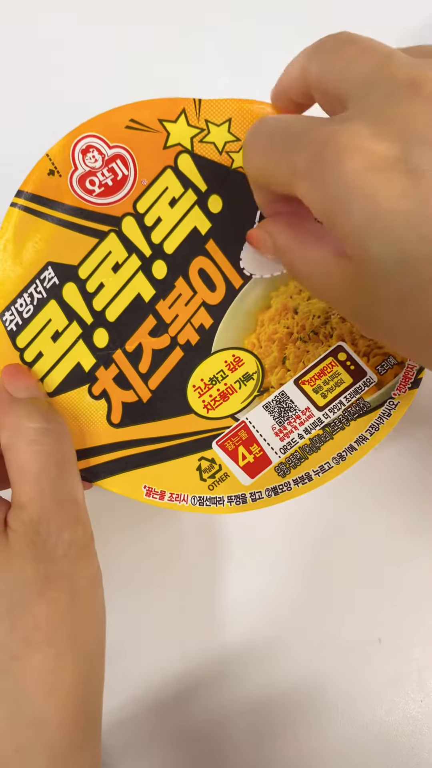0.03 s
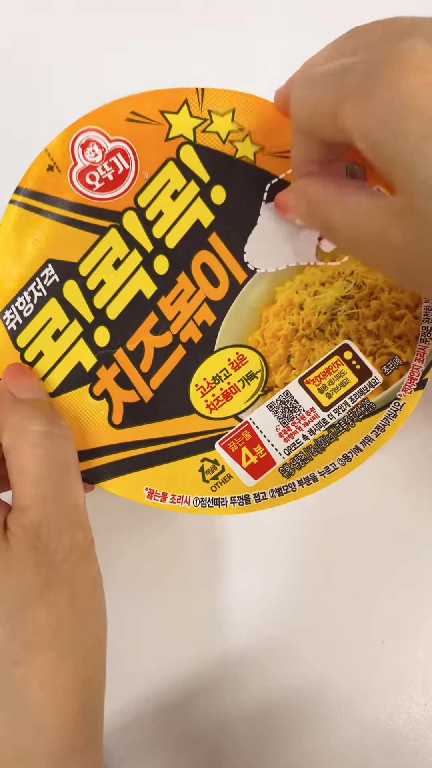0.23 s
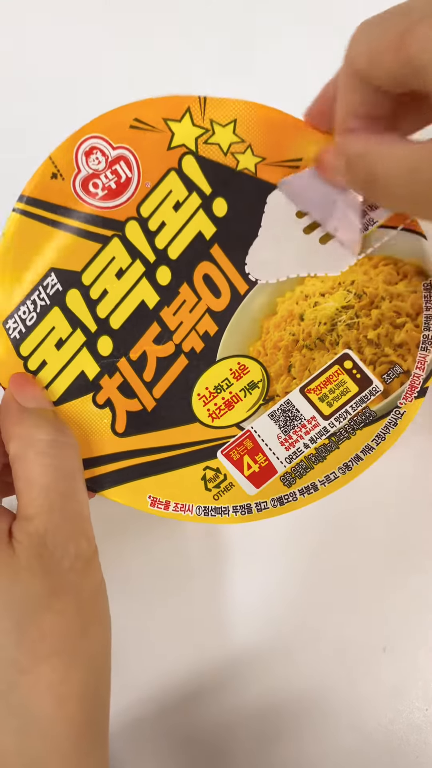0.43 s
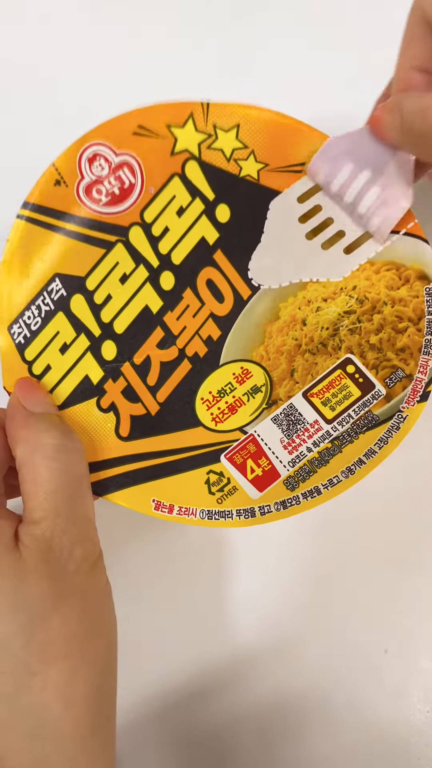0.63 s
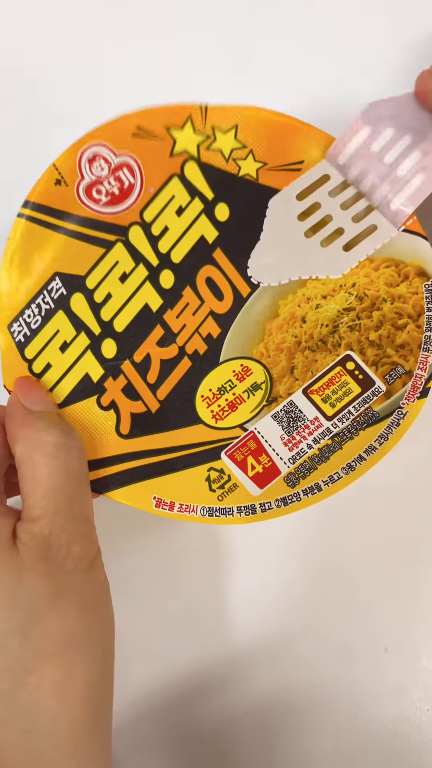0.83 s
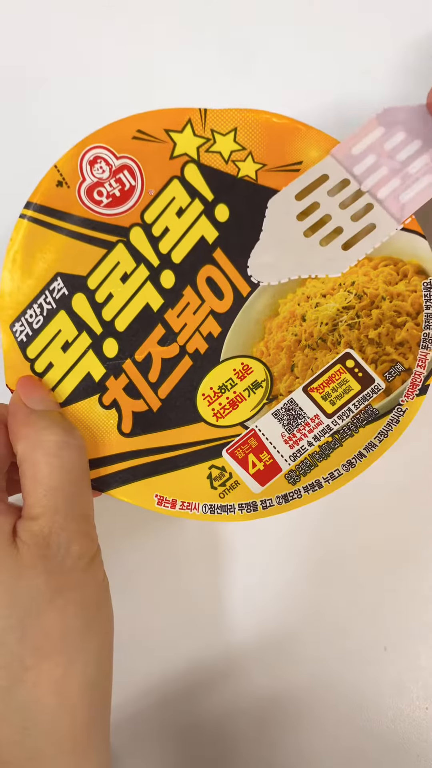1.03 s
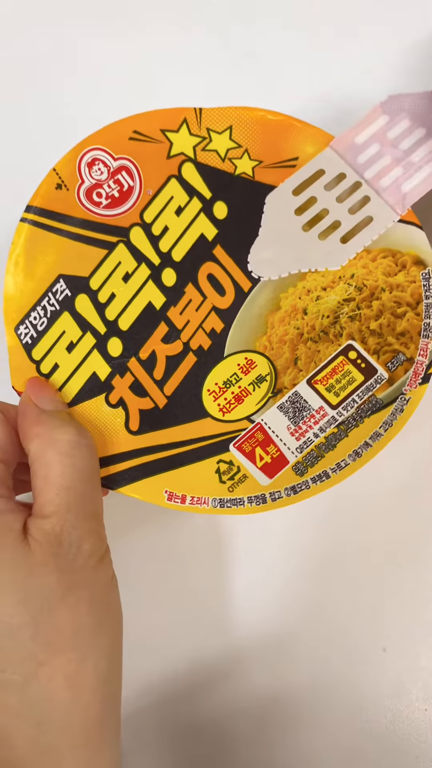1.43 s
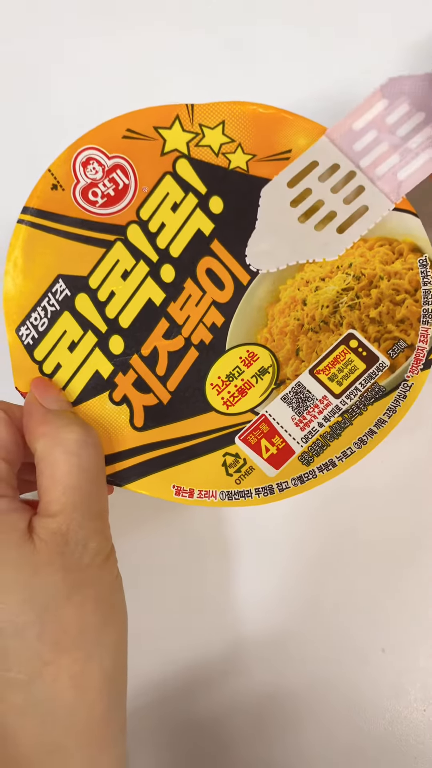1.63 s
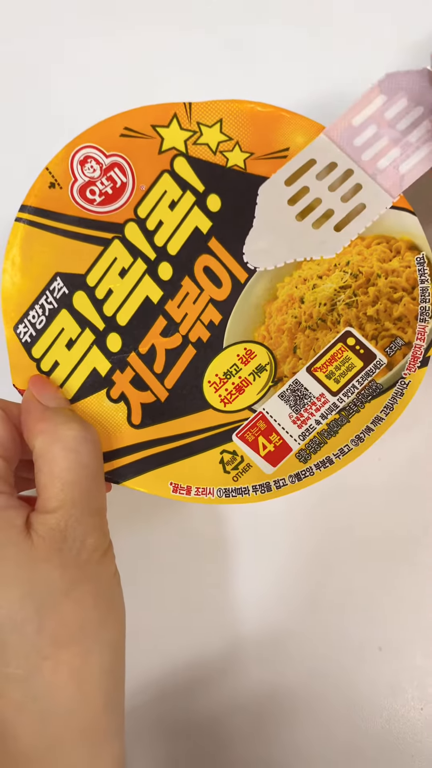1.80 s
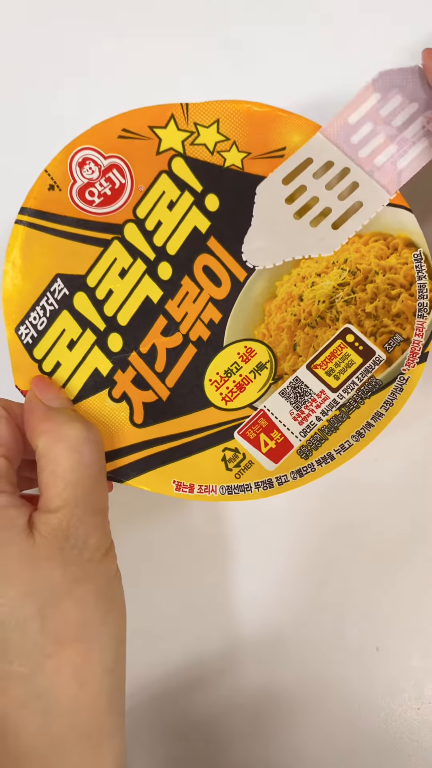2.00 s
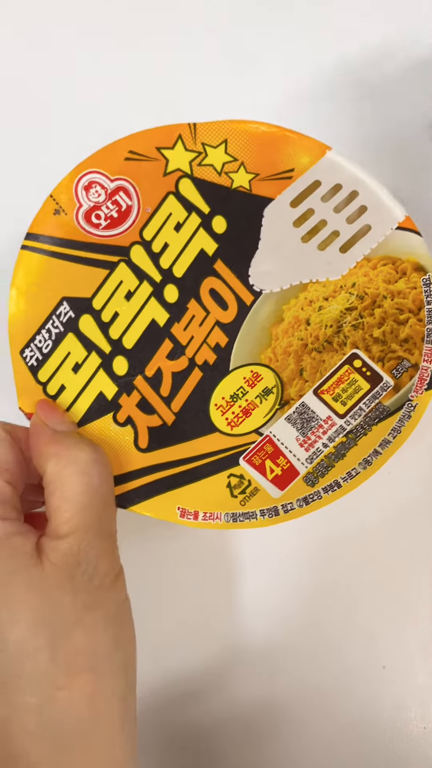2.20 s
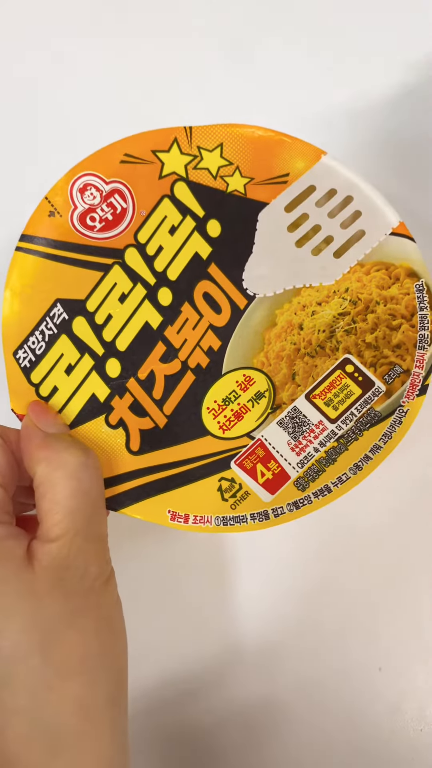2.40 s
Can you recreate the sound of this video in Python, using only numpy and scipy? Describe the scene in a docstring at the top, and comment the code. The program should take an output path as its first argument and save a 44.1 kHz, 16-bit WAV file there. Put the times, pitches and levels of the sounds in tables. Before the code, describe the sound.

A perforated paper tab tearing off a noodle cup lid with crisp little snaps.

```python
"""Peeling the tab off a noodle cup

A quiet room, a stereo pair of microphones close to the cup. A fingernail picks a perforated paper tab
loose and it is peeled off the lid. Each paper bridge that tears gives a burst of fibre snaps and rings
the taut lid and the cup under it. Then the loose tab ticks as it bends, comes away with a short rasp,
and the hand nudges the cup on the table."""
import sys
import numpy as np
from scipy import signal
from scipy.fft import rfft, irfft
from scipy.io import wavfile
from scipy.ndimage import uniform_filter1d

SR = 44100
rng = np.random.default_rng(int(sys.argv[2]) if len(sys.argv) > 2 else 0)


def wrap_up_sound(samples):
    """Save the sound to the file named by the first command line argument, as 16-bit audio."""
    columns = np.atleast_2d(samples).T
    # keep every value between -1 and 1, then stretch to whole-number steps
    tamed = np.clip(columns, -1, 1)
    steps = np.round(tamed * 32767).astype(np.int16)
    wavfile.write(sys.argv[1], SR, steps)


N = 112454
T = np.arange(N) / SR
HIT_T = np.arange(4096) / SR


def amp(db):
    """Decibels to gain."""
    return 10 ** (np.asarray(db) / 20)


def unit(x):
    """Scales to rms 1."""
    return x / np.sqrt(np.mean(x ** 2) + 1e-20)


def unit_hit(x, samples=180):
    """Scales a hit to the energy of four milliseconds at rms 1."""
    return unit(x) * np.sqrt(samples / x.shape[-1])


def read(points, hz):
    """Reads a spectrum table on a log-frequency axis."""
    f, value = np.transpose(points)
    return np.interp(np.log(hz + 1), np.log(f + 1), value)


def level(points):
    """Gain over time from a table of (t/s, level/dB)."""
    return amp(np.interp(T, *np.transpose(points)))


def add(mix, s, sound):
    """Adds a stereo sound at a time."""
    part = mix[:, max(round(s * SR), 0):][:, :sound.shape[1]]
    part += sound[:, :part.shape[1]]


def convolve(x, response):
    """Filters each channel, keeping the length."""
    return signal.fftconvolve(np.atleast_2d(x), np.atleast_2d(response), axes=1)[:, :x.shape[-1]]


# Likeness of the noise at the two microphones (f/Hz, correlation)
MIC_LIKENESS = [(40, 0.89), (150, 0.87), (300, 0.1), (2000, 0.035)]
def noise(colour):
    """Stereo noise of a given spectrum, nearly mono in the bass."""
    hz = np.fft.rfftfreq(N, 1 / SR)
    left, apart = rfft(rng.standard_normal((2, N)))
    same = read(MIC_LIKENESS, hz)
    right = same * left + np.sqrt(1 - same ** 2) * apart
    return unit(irfft(np.array([left, right]) * amp(read(colour, hz)), N))


# Spectrum of the room air (f/Hz, relative level/dB)
AIR_COLOUR = [(20, -16), (82, -8), (256, -4), (545, -15.5), (734, -8), (1370, -15), (1890, -21.5),
              (3820, -32), (16000, -58)]
# Tones of the hum (f/Hz, level/dB)
HUM_TONES = [(80.7, -61.5), (177.6, -67), (242.2, -62.5)]
def ventilation(air_db=-55.5):
    """Quiet ventilation noise all round the microphones, with a faint hum in the centre."""
    hum = sum(amp(db) * np.sqrt(2) * np.sin(2 * np.pi * (hz * T + rng.random())) for hz, db in HUM_TONES)
    return amp(air_db) * noise(AIR_COLOUR) + hum


# Decay of the room (f/Hz, t60/s)
ROOM_DECAY = [(150, 0.37), (3000, 0.15), (7000, 0.17), (15000, 0.36)]
# Spectrum of its tail (f/Hz, relative level/dB)
TAIL_COLOUR = [(100, -13), (300, 5), (1000, 2.5), (2500, 3), (7000, -4.5), (15000, -11.5)]
# Reflection from near the cup (t/s, left level/dB, right level/dB)
REFLECTIONS = [(.0084, -12.5, -25)]
def room(x, tail_db=-12, early_db=3.5, early_s=.026):
    """The room answers with a dull near reflection and a short diffuse tail."""
    hz, t, spectra = signal.stft(rng.standard_normal((2, SR // 2)), SR, nperseg=256)
    decay_db = early_db * np.exp(-t / early_s) - 60 * t / read(ROOM_DECAY, hz)[:, None]
    tail = signal.istft(spectra * amp(read(TAIL_COLOUR, hz)[:, None] + decay_db), SR, nperseg=256)[1]
    tail *= np.clip(np.arange(tail.shape[1]) / SR / .0015 - 1, 0, 1)  # fades in from 1.5 to 3 ms
    tail *= amp(tail_db) / np.linalg.norm(tail[0])
    dull = np.hanning(11)
    for s, left_db, right_db in REFLECTIONS:
        add(tail, s, amp([[left_db], [right_db]]) * dull / dull.sum())
    return convolve(x, tail)


# Modes of the air inside the cup (f/Hz, relative level/dB)
CAVITY_MODES = [(857, -2), (1121, -4), (1238, 1), (1344, 1), (2090, -3)]
def cavity(x, t60=.42):
    """The air in the cup rings on in narrow resonances after every snap."""
    fade = amp(-60 * T / t60)
    phases = 2 * np.pi * rng.random((len(CAVITY_MODES), 2, 1))
    ring = sum(amp(db) * np.sin(2 * np.pi * hz * T + phase)
               for (hz, db), phase in zip(CAVITY_MODES, phases))
    return convolve(x, 2 * ring * fade / fade.sum())


# Rumble of the handled cup (t/s, level/dB)
RUMBLE_LEVEL = [(0, -63), (.3, -52), (.39, -43), (.48, -56), (.58, -44), (.68, -49), (1.0, -62),
                (1.62, -61.5), (1.69, -51.5), (1.76, -57.5), (2.55, -60.5)]
# Its spectrum (f/Hz, relative level/dB)
RUMBLE_COLOUR = [(20, -22), (60, 7.5), (120, 0), (250, -7), (500, -30), (1500, -60)]
def handling():
    """Low rumble of the hand on the cup."""
    return noise(RUMBLE_COLOUR) * level(RUMBLE_LEVEL)


# Modes of the cup's base (f/Hz, relative level/dB)
BASE_MODES = [(255, 0.5), (620, -2), (705, 4.5), (830, -3)]
# The cup rubs on the table (t/s, level/dB before panning)
SLIDE_LEVEL = [(2.3, -89), (2.42, -56.5), (2.55, -55)]
# The hand nudges the cup (t/s, level/dB before panning)
HAND_NUDGES = [(2.463, -41), (2.531, -39.5), (2.545, -43)]
CUP_RISE_S, CUP_T60_S = .0015, .026
def slide(pan_db=3):
    """The cup shifts on the table, left of centre: friction and a few soft nudges ring its base."""
    ring = sum(amp(db - 60 * HIT_T / CUP_T60_S) * np.sin(2 * np.pi * hz * HIT_T) for hz, db in BASE_MODES)
    ring = unit_hit(ring * (1 - np.exp(-HIT_T / CUP_RISE_S)))[None]
    out = level(SLIDE_LEVEL) * unit(convolve(rng.standard_normal(N), ring))
    for s, db in HAND_NUDGES:
        add(out, s, amp(db) * ring)
    return out * amp([[pan_db], [-pan_db]])


def cup_thump(hz, pan_db=1.5):
    """The cup under the lid gives one damped low note near hz, a little right of centre."""
    ring = np.sin(2 * np.pi * hz * rng.uniform(.88, 1.12) * HIT_T) * amp(-60 * HIT_T / CUP_T60_S)
    return amp([[-pan_db], [pan_db]]) * unit_hit(ring * (1 - np.exp(-HIT_T / CUP_RISE_S)))


# Modes of the lid (multiple of its pitch, relative left level/dB, relative right level/dB, t60/s)
LID_MODES = [(1, 2.5, -3, 0.014), (.72, -21, -26, 0.013), (.87, -24, -28, 0.035), (1.22, -3.5, -8, 0.016),
             (2.05, -16, -24, .025)]
def lid(hz, rise_s=.0009, left_lead_s=.00013):
    """The taut lid rings, earlier and louder at the left microphone."""
    t = np.maximum(HIT_T - np.array([[0], [left_lead_s]]), 0)
    ring = sum(amp(np.array([[left], [right]]) - 60 * t / t60) * np.sin(2 * np.pi * hz * ratio * t)
               for ratio, left, right, t60 in LID_MODES)
    return unit_hit(ring * (1 - np.exp(-(t / rise_s) ** 2)))


# Spectrum of tearing paper (f/Hz, relative level/dB)
PAPER_COLOUR = [(400, -25.5), (650, -10), (1200, 1), (1700, -7.5), (2100, 1), (2800, -7), (3500, -2.5),
                (6000, -6), (7500, -8), (10200, -10), (13000, -19), (15000, -13.5)]
def paper(tilt_db, peak_hz, peak_db=3.5, peak_octaves=.24, ripple_db=2):
    """Response of the paper to one snapping fibre; every spot has its own uneven colour."""
    hz = abs(np.fft.fftfreq(2048, 1 / SR)) + 1
    octaves = np.log2(hz / peak_hz)
    db = read(PAPER_COLOUR, hz) + tilt_db * np.maximum(octaves, -2)
    db += peak_db * np.exp(-.5 * (octaves / peak_octaves) ** 2)
    ripple = uniform_filter1d(uniform_filter1d(rng.standard_normal(len(hz)), size=24), size=12)
    db += ripple_db * unit(ripple + ripple[::-1])
    minimum_phase = np.exp(np.conj(signal.hilbert(np.log(amp(db)))))
    return np.fft.ifft(minimum_phase).real[:len(hz) // 2]


# Arrival of a tear at the pair (f/Hz, lag of the left microphone/s)
TEAR_LAG = [(1500, -.00018), (3000, -.00008), (5000, 0), (7000, .00018)]
def at_microphones(shared, apart, same=.75):
    """A tear's body reaches the left first, its treble the right; a part scatters differently to each."""
    hz = np.fft.rfftfreq(len(shared), 1 / SR)
    left = irfft(rfft(shared) * np.exp(-2j * np.pi * hz * read(TEAR_LAG, hz)), len(shared))
    return np.sqrt(same) * np.array([left, shared]) + np.sqrt(1 - same) * apart


# Fibres part between the snaps (t/s, level/dB)
PEEL_LEVEL = [(.05, -67.5), (.24, -57), (.305, -52), (.335, -27), (.365, -53), (.45, -55), (.63, -47),
              (.72, -48.5), (.79, -52.5), (.87, -57.5), (.94, -50.5), (1.08, -116)]
# The loose tab rubs and comes away (t/s, level/dB)
RUB_LEVEL = [(.8, -97), (.95, -60.5), (1.25, -70.5), (1.4, -63), (1.5, -57), (1.56, -71.5), (1.66, -66),
             (1.77, -66.5), (2.158, -73.5), (2.166, -47), (2.21, -54), (2.29, -64), (2.41, -59.5),
             (2.47, -70)]
def crackle(curve, per_s, tilt_db, ring_db, lid_hz, peak_hz, spread_db=4):
    """A stream of tiny fibre snaps that also stirs the lid."""
    size = amp(spread_db * np.minimum(rng.exponential(1, (3, N)), 4))
    clicks = size * rng.choice([-1, 1], (3, N)) * (rng.random((3, N)) < per_s / SR)
    fizz = unit(convolve(at_microphones(clicks[0], clicks[1:]), paper(tilt_db, peak_hz)))
    ring = unit(convolve(clicks[0], lid(lid_hz)))
    return level(curve) * (fizz + amp(ring_db) * ring)


LEAD_SAMPLES = 176  # the crack builds for this long before lid and cup sound
LEAD_S = LEAD_SAMPLES / SR
CRACK_PEAK_S, CRACK_RISE_S, CRACK_FALL_S = .0006, .00097, .0016
def snap(lid_hz, ring_db, crack_db, tilt_db, peak_hz, thump_db, thump_hz=260, roughness=.49):
    """Fibres give way in a swelling burst; the released lid rings and the cup thumps."""
    left, right, shared, size = rng.standard_normal((4, len(HIT_T)))
    grain = np.exp(roughness * np.clip(size, -1, 1))
    fibres = at_microphones(shared * grain, np.array([left, right]) * grain)
    since_peak = HIT_T - LEAD_S - CRACK_PEAK_S
    burst = fibres * np.exp(-abs(since_peak) / np.where(since_peak < 0, CRACK_RISE_S, CRACK_FALL_S))
    crack = unit_hit(convolve(burst, paper(tilt_db, peak_hz)))
    body = amp(ring_db) * lid(lid_hz) + amp(thump_db) * cup_thump(thump_hz)
    return amp(crack_db) * crack + np.pad(body, ((0, 0), (LEAD_SAMPLES, 0)))[:, :len(HIT_T)]


# Creases of the loose tab (t/s, relative level/dB, tilt/dB per octave)
TAB_CREASES = [(0.248, -40.5, 5), (1.109, -43, 7), (1.19, -49, 4), (1.232, -50, 5.5), (1.32, -52.5, 2.5),
               (1.3644, -31.5, 3), (1.659, -47.5, 8), (1.7097, -35, 2.5), (1.752, -38.5, 6),
               (2.096, -53.5, 4.5), (2.162, -51, 7), (2.265, -48.5, 2), (2.365, -48.5, 2),
               (2.532, -46.5, -4.5)]
def creasing(gain_db=-1):
    """The tab ticks as it bends, each crease a small snap."""
    out = np.zeros((2, N))
    for s, db, tilt_db in TAB_CREASES:
        tick = snap(lid_hz=955, ring_db=-9, crack_db=0, tilt_db=tilt_db, peak_hz=3070, thump_db=-22.5)
        add(out, s - LEAD_S, amp(gain_db + db) * tick)
    return out


# Picks of the fingernail (t/s, lid f/Hz, lid level/dB, crack level/dB, crack tilt/dB per octave,
# crack resonance f/Hz, thump level/dB, nominal thump f/Hz)
NAIL_PICKS = [(0.0768, 1064, -40.5, -40.5, -1.5, 2150, -45, 270),
              (0.1215, 996, -37, -45.5, 3.5, 4530, -43.5, 270),
              (.147, 1110, -34.5, -39.5, 4.5, 1850, -37.5, 264),
              (0.1898, 900, -38.5, -37.5, 4.5, 6260, -48.5, 244),
              (.217, 740, -29.5, -32.5, -8, 2430, -34, 363)]
def picking():
    """The fingernail picks the tab loose with a few soft snaps."""
    out = np.zeros((2, N))
    for s, *pick in NAIL_PICKS:
        add(out, s - LEAD_S, snap(*pick))
    return out


# Paper bridges of the perforation (t/s, lid f/Hz, relative lid level/dB, relative crack level/dB,
# crack tilt/dB per octave, crack resonance f/Hz)
BRIDGES = [ (.311, 915, -33, -36, 1.5, 2100), (.323, 970, -30, -27.5, 0, 3040),
           (0.3311, 1358, -28, -25, -3, 3100), (0.334, 1250, -28, -15.5, 23, 1890),
           (0.3373, 900, -28, -21, -4, 4900), (0.3442, 910, -24.5, -24.5, 8, 1900),
           (0.353, 954, -20, -28, 0.5, 2207), (.3592, 933, -27, -25, -0.5, 3980),
           (0.3809, 960, -27, -29, -2, 4360), (0.3878, 887, -19.5, -25.5, 1, 3220),
           (0.3914, 1017, -23.5, -21.5, 3.5, 2700), (0.4193, 882, -21.5, -24.5, -1.5, 2150),
           (0.4288, 804, -22, -24.5, 1, 1830), (0.4703, 950, -19.5, -24.5, 4, 9800),
           (0.4782, 1078, -13.5, -23.5, 1.5, 5000), (0.4873, 1124, -35, -35, -2, 4000),
           (0.515, 966, -17, -26, 6, 7360), (0.5189, 980, -31, -23, 1, 4350),
           (0.5548, 1032, -20.5, -23, -1, 4130), (0.5703, 956, -23, -23.5, 3, 7560),
           (0.595, 980, -25.5, -22, 0, 1980), (0.6219, 1000, -28, -25.5, -3, 2044),
           (0.6331, 1077, -23.5, -19, -2.5, 1980), (0.6773, 1010, -27, -25.5, 1, 4700),
           (0.6925, 970, -25, -22, -4.5, 2140), (.727, 955, -36, -27.5, 0, 2220),
           (0.7365, 1033, -27, -24.5, 4.5, 2900), (0.7939, 1132, -27, -24, 0, 2280),
           (0.8911, 1110, -37, -37.5, 1, 4580), (0.8986, 720, -38, -32, 5.5, 4660),
           (0.9291, 768, -34, -29, 3.5, 4160)]
def tearing(gain_db=-1, first_thump_db=-24.5, growth_db_per_s=21.5):
    """The bridges break one by one; the thump grows against the crack as the tear nears the rim."""
    out = np.zeros((2, N))
    for s, lid_hz, ring_db, crack_db, tilt_db, peak_hz in BRIDGES:
        thump_db = crack_db + first_thump_db + growth_db_per_s * (s - BRIDGES[0][0])
        add(out, s - LEAD_S, snap(lid_hz, ring_db, crack_db, tilt_db, peak_hz, thump_db))
    return amp(gain_db) * out


def scene():
    """The cup and its tab close to the microphones, the quiet room behind."""
    peel = crackle(PEEL_LEVEL, per_s=3500, tilt_db=.5, ring_db=-5.5, lid_hz=927, peak_hz=2170)
    rub = crackle(RUB_LEVEL, per_s=1100, tilt_db=1, ring_db=-4, lid_hz=873, peak_hz=4260)
    close = picking() + tearing() + creasing() + peel + rub + slide() + handling()
    return close + cavity(close) + room(close) + ventilation()


def record(dry, edge_hz=15850):
    """The recorder's band limit."""
    lowpass = signal.firwin(401, edge_hz, window=("kaiser", 9), fs=SR)
    return signal.oaconvolve(dry, lowpass[None], "same")


dry = scene()
out = record(dry)
wrap_up_sound(out)
```